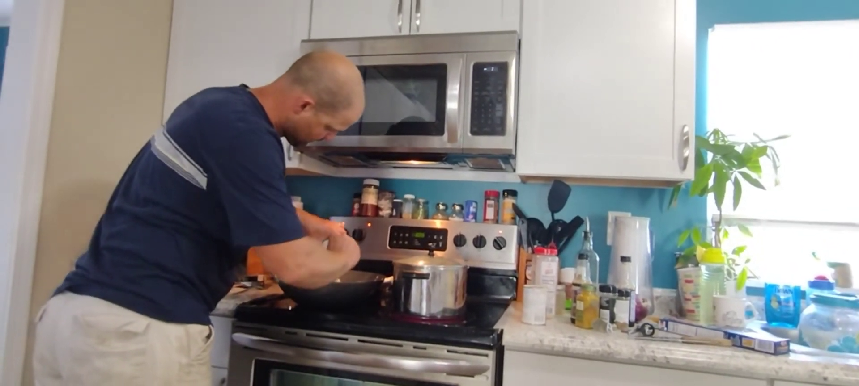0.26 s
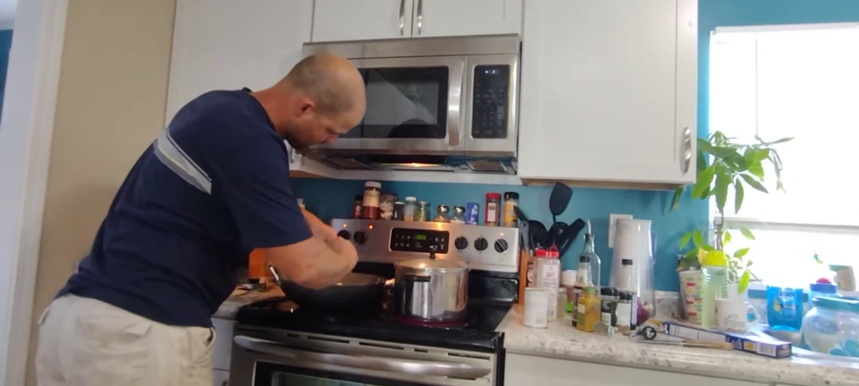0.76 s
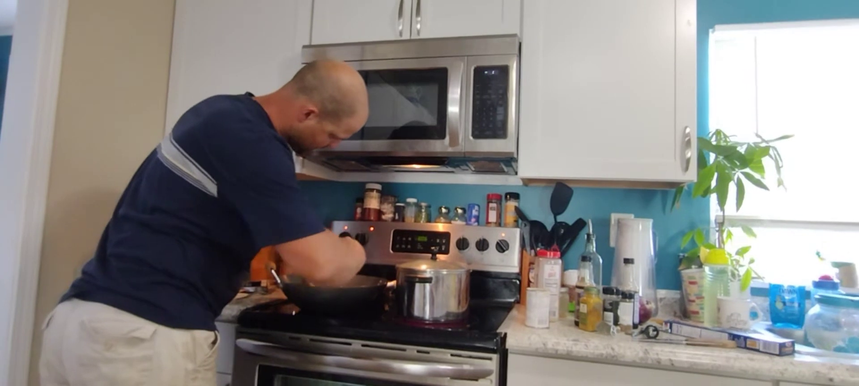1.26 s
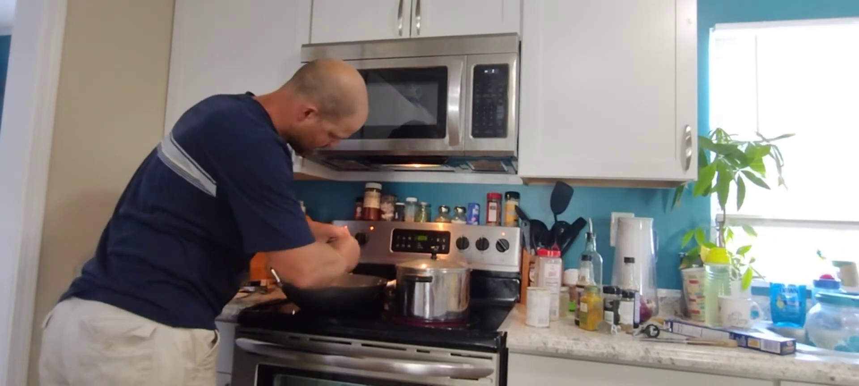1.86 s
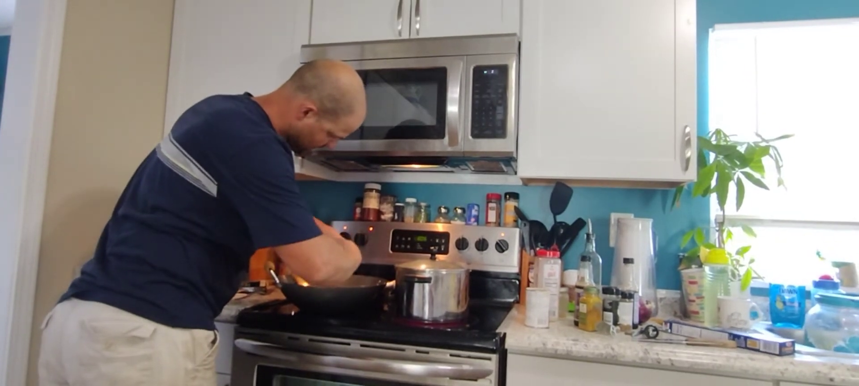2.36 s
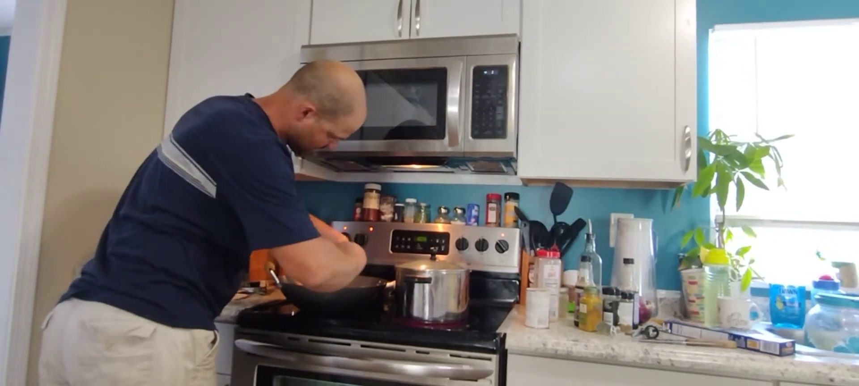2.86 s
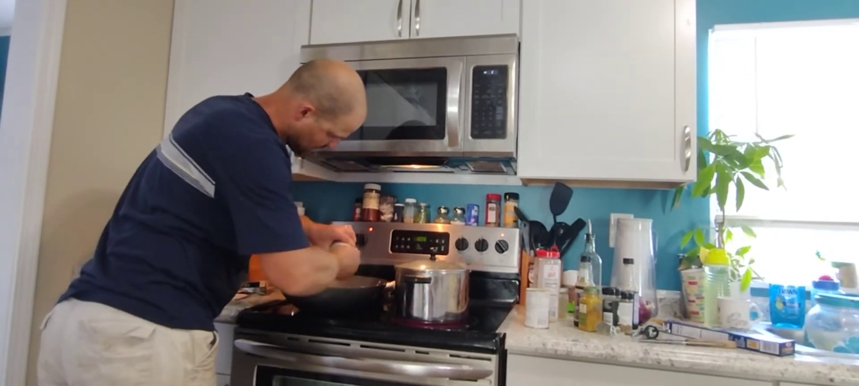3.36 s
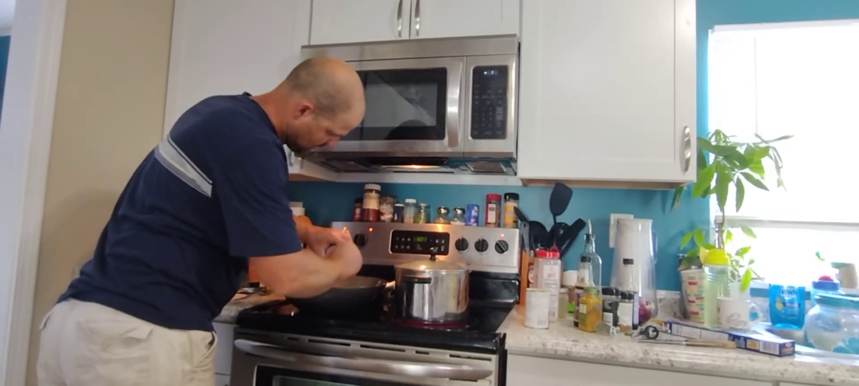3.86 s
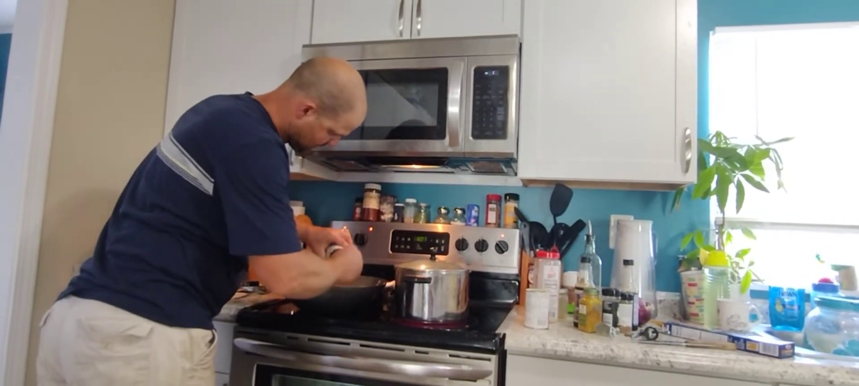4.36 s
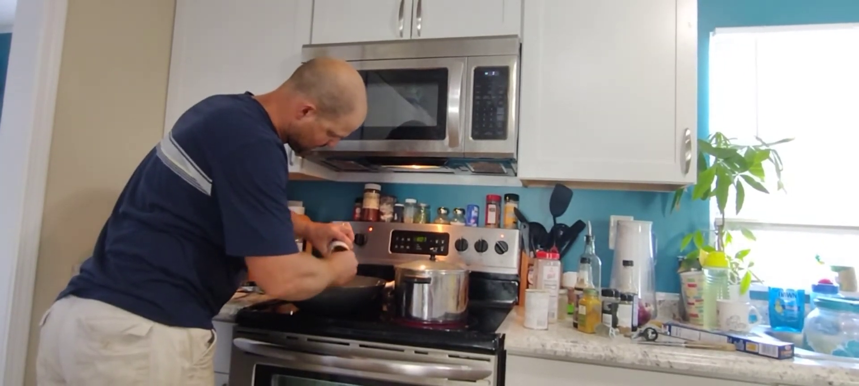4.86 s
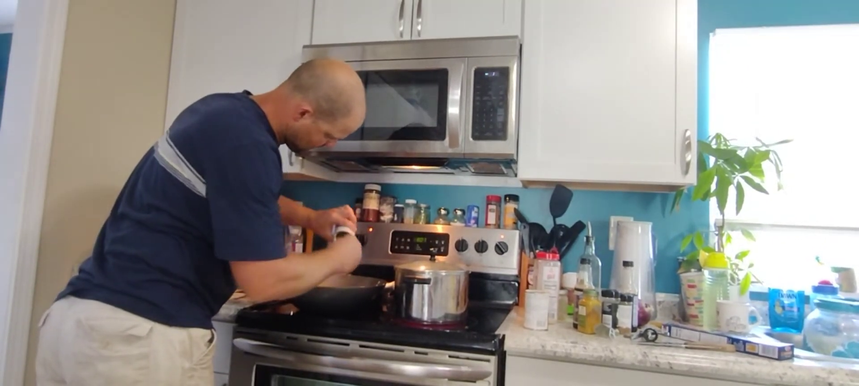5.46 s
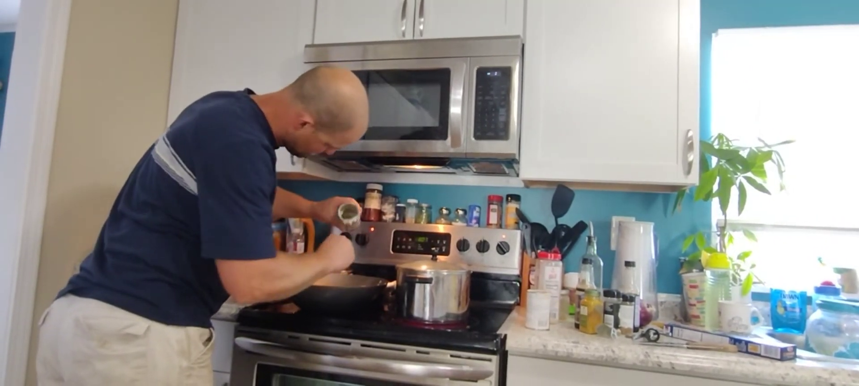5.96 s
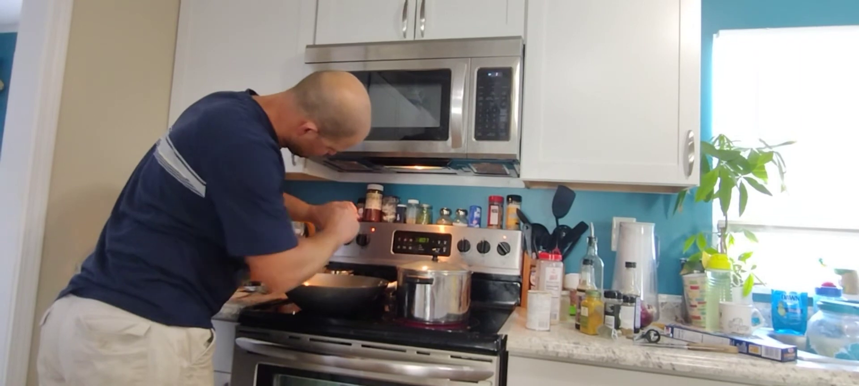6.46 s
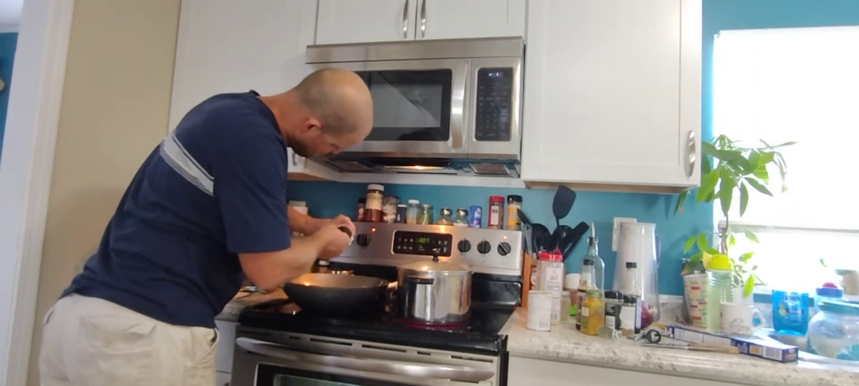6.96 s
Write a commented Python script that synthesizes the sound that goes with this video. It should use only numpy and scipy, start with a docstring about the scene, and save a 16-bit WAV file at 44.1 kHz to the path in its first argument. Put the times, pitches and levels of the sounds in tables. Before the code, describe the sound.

A steel can opener works around a tin in a small, hard-walled kitchen, heard in stereo from a few steps away. A hollow tonk opens at 0 s, with lighter clicks at 0.3-0.5 s and a strong, ringing clunk near 0.8 s. A gritty scrape at 1.0-1.3 s makes the can's air hum in fluttering bursts. Another hollow knock falls at 1.6 s, then a bright clank at 2.3 s with a thin squeak. Firm rasps swell around 2.5 and 2.9 s. Sharp clicks and hollow clanks cluster at 3.2-4.0 s, the brightest at 3.6 and 3.95 s. Smaller ticks and faint rubbing follow, with moderate knocks at 4.7 and 5.0 s and a light flurry until 5.3 s. After roughly a second of near-pause, a double clank at 6.5 s leads into a faint scrape and squeak. Low, wavering appliance drone runs throughout.

```python
"""In a kitchen, some steps from a stereo microphone, a steel tool works round the rim of a tin can.
It knocks (noise cracks and decaying modes), scrapes (swelling coloured noise) and squeaks (narrow noise).
The air in the can answers near 620 Hz, its wall rings briefly above; hard walls smear every contact.
Appliances drone low in the background: broad noise and wavering tones."""
import sys
import numpy as np
from scipy import signal
from scipy.fft import rfft, irfft, next_fast_len
from scipy.io import wavfile
from scipy.ndimage import uniform_filter1d, map_coordinates

SR = 44100
rng = np.random.default_rng(int(sys.argv[2]) if len(sys.argv) > 2 else 0)


def int16_out(signal):
    """Quantize to a 16-bit WAV file."""
    q = np.round(np.clip(np.atleast_2d(signal).T, -1, 1) * 32767)
    wavfile.write(sys.argv[1], SR, q.astype(np.int16))


N = 318402

# how alike cracks and scrapes reach the two microphones: f/Hz, left-right likeness (1 = same)
CAN_LIKENESS = [(300, 1), (640, 0.93), (1400, 0), (3100, 0), (6800, 0.064), (10000, 0.8), (15000, 0.7)]


def amp(db):
    """Amplitude factor of a level in dB."""
    return 10 ** (np.asarray(db) / 20)


def unit(x):
    """x scaled to an rms of 1."""
    return x / np.sqrt(np.mean(x ** 2) + 1e-20)


def along(points, hz):
    """Reads a curve of (f/Hz, value) points on a log frequency axis."""
    f, value = np.transpose(points)
    return np.interp(np.log(hz + 1), np.log(f + 1), value)


def filtered(x, response):
    """x shaped by a complex response of frequency."""
    m = next_fast_len(N + SR // 2)
    spectrum = rfft(x, m) * response(np.fft.rfftfreq(m, 1 / SR))
    return irfft(spectrum, m)[..., :N]


def resonances(peaks):
    """Response of parallel resonators (f/Hz, width/Hz, level/dB), alternating in polarity."""
    def response(f):
        total = 0
        for k, (centre, width, db) in enumerate(peaks):
            total = total + (-1) ** k * amp(db) * 1j * f * width / (centre ** 2 - f * f + 1j * f * width)
        return total
    return response


def wobble(rate):
    """A smooth random curve, rate knots a second."""
    knots = rng.standard_normal(int(N * rate / SR) + 4)
    return map_coordinates(knots, [np.arange(N) * rate / SR])


def pair(response, alike, patchy_db=0):
    """Stereo noise of rms 1 with a colour, a likeness of the channels and patches of random gain."""
    z = signal.stft(rng.standard_normal((2, N)), nperseg=256)[2]
    field = uniform_filter1d(rng.standard_normal(z.shape[1:]), size=3, axis=0)  # over frequency
    field = uniform_filter1d(field, size=12, axis=1)  # over time
    noise = signal.istft(z * amp(patchy_db * unit(field)), nperseg=256)[1][:, :N]

    def mid_side(hz):
        turn = np.arccos(np.clip(along(alike, hz), -1, 1)) / 2
        return response(hz) * np.array([np.cos(turn), np.sin(turn)])
    mid, side = filtered(noise, mid_side)
    return unit(np.array([mid + side, mid - side]))


def add(track, s, sound):
    """Lays a sound into a track at s seconds."""
    k = round(s * SR)
    track[..., k:k + sound.shape[-1]] += sound


def pressure():
    """Gains of rasp, hollow, grind and edge: strokes swell to their firmest moment over light rubbing."""
    # strokes along the rim: start t/s, firmest t/s, end t/s, rasp level/dB, hollow level/dB
    strokes = [(0.0, 0.006, 0.11, -52.5, -38), (0.467, 0.533, 0.65, -55.5, -52),
               (0.79, 0.829, 0.95, -61, -39), (1.017, 1.119, 1.275, -45, -34.5),
               (1.757, 1.94, 2.03, -74.5, -59), (2.316, 2.347, 2.4, -70, -43),
               (2.417, 2.526, 2.632, -48, -38.5), (2.829, 2.915, 3.028, -45, -36),
               (3.206, 3.277, 3.44, -63.5, -64.5), (3.615, 3.706, 3.874, -56, -50.5),
               (3.97, 4.002, 4.16, -74, -42.5), (4.692, 4.757, 5, -69, -85),
               (5.28, 5.36, 5.48, -75.5, -66.5), (6.604, 6.724, 6.96, -80, -62.5)]
    # light rubbing between and under the strokes: t/s, rasp level/dB
    rubbing = [(0.0, -63), (0.34, -77), (0.42, -73), (1.12, -70), (2.21, -73), (2.45, -69), (2.59, -68),
               (3.24, -72.5), (3.66, -69.5), (4.22, -68), (5.19, -70.5), (5.45, -73), (5.95, -82),
               (6.43, -86.5), (6.6, -74), (7.22, -77)]
    # how pointed the swell is: exponents of rasp, hollow, grind, edge
    pointedness = [2.2, 1.8, 3, 2.4]
    rubbing_hollow_db = 2.5  # over the rasp
    full_stroke_db = -45
    grind_db, grind_grows = -0.8, 1.06  # over the rasp of a full stroke; dB per dB of rasp
    edge_db, edge_grows = 4, 1.2  # treble of the rasp, by the same law

    def four_gains(rasp_db, hollow_db):
        below_full = rasp_db - full_stroke_db
        grind = full_stroke_db + grind_db + grind_grows * below_full
        edge = full_stroke_db + edge_db + edge_grows * below_full
        return amp([rasp_db, hollow_db, grind, edge])

    t = np.arange(N) / SR
    light_db = np.interp(t, *np.transpose(rubbing))
    total = four_gains(light_db, light_db + rubbing_hollow_db)
    for start, firmest, end, rasp_db, hollow_db in strokes:
        push = np.sin(np.pi / 2 * np.interp(t, [start, firmest, end], [0, 1, 0]))
        swell = push ** np.array(pointedness)[:, None]
        total = total + four_gains(rasp_db, hollow_db)[:, None] * swell
    return total


def drag():
    """Rubbing grains hiss, colour in the tin and keep the air column humming unevenly."""
    # colour of the rubbing hiss: f/Hz, level/dB per Hz (relative)
    rasp_colour = [(530, -62), (900, -15), (1420, 2.5), (1700, -9.5), (1880, -24), (2570, -8), (4310, -6.5),
                   (4800, -2), (15100, -11), (16000, -39)]
    # resonances of the rasped tin: f/Hz, width/Hz, level/dB (doubled in amplitude below)
    rim = [(1215, 60, -3), (1510, 270, -26), (1863, 81, 19), (2150, 182, 16), (3300, 280, 2), (4076, 43, 9),
           (5600, 120, -9)]
    # resonances of the ground wall: f/Hz, width/Hz, level/dB (relative)
    grind_modes = [(1300, 300, -3), (1458, 160, 3), (1890, 170, 1), (2240, 118, 4.5), (2460, 320, -12),
                   (3454, 120, -0.5)]
    # resonances of the rasped air: f/Hz, width/Hz, level/dB (relative, ahead of the low cut)
    air_modes = [(550, 61.4, -8.5), (607.3, 17.4, 3.5), (612, 23.7, 7), (642.4, 61.3, -4.5),
                 (753, 7, -11.5)]
    rasp_gain, hollow_gain, grind_gain, edge_gain = pressure()
    tin = resonances(rim)
    rasp = pair(lambda f: amp(along(rasp_colour, f)) * (1 + 2 * np.abs(tin(f))), CAN_LIKENESS, patchy_db=2.0)
    grain = amp(2.2 * wobble(45) + 2.2 * wobble(500))  # slow and fast roughness
    grind = grind_gain * pair(resonances(grind_modes), CAN_LIKENESS, patchy_db=4)
    edge = filtered(rasp, lambda f: 1 / (1 + (8000 / (f + 1)) ** 6))  # the treble alone
    low_cut = lambda f: f ** 4 / (f ** 4 + 520 ** 4)
    air = pair(lambda f: resonances(air_modes)(f) * low_cut(f), [(600, .9)])
    air = filtered(air, lambda f: np.exp([[.25j], [-.25j]]))  # the left microphone leads by 0.5 rad
    scrape = rasp_gain * (rasp - edge) + edge_gain * edge + grind
    return grain * scrape + hollow_gain * air


def drone():
    """Broad appliance noise with low tones that swell and waver slowly."""
    # colour of the noise: f/Hz, level/dB per Hz (relative)
    colour = [(18, -46), (30, -11.5), (189, 3.5), (280, -6), (473, -5), (569, -13), (801, -9.5),
              (1070, -13.5), (1460, -14), (6720, -32), (14800, -39.5), (16000, -61)]
    # left-right likeness of the noise: f/Hz, likeness (negative = opposed)
    likeness = [(60, 0.82), (180, 0.87), (550, 0.47), (1650, -0.46), (4970, 0.096), (15000, 0.34)]
    # appliance tones: f/Hz, middle level/dB
    hum = [(25, -92), (58, -78), (82, -69.5), (118, -71.5), (167, -68), (195, -71.5), (242, -77),
           (690, -78), (802, -77)]
    noise_db = -63
    t = np.arange(N) / SR
    tones = 0
    for hz, db in hum:
        gain = amp(db + 1.79 * wobble(5.1))
        tones = tones + gain * np.sin(2 * np.pi * hz * t + 1.5 * wobble(4.4))
    return amp(noise_db) * pair(lambda f: amp(along(colour, f)), likeness) + tones


def toot(t, hz, t60, rise, beat_db):
    """The air column swells, rings and beats against a neighbouring mode 4.5 % above or below."""
    lead = np.array([[.25], [-.25]])  # rad; the left microphone hears it a little early
    near_hz = hz * rng.choice([.955, 1.045])
    near = amp(beat_db) * np.sin(2 * np.pi * (near_hz * t + rng.random()) + lead)
    envelope = amp(-60 * t / t60) * (1 - np.exp(-t / rise))
    return (np.sin(2 * np.pi * hz * t + lead) + near) * envelope


def clang(t, hz, db, t60, rough):
    """Fading wall modes stray in phase, since hand and tool keep touching the tin; high ones die first."""
    steps = rng.standard_normal((2, len(hz), len(t) // 64 + 1))  # per microphone and mode
    stray = np.cumsum(steps, -1).repeat(64, -1)[..., :len(t)]
    phase = 2 * np.pi * (hz * t + rng.random((2, len(hz), 1)))
    phase = phase + rough * (hz / 2000) ** 0.38 * uniform_filter1d(stray, 128)
    fade = amp(db - 60 * t / t60 * (hz / 2000) ** 0.29)  # t60 holds at 2 kHz
    return (fade * np.sin(phase)).sum(1) * (1 - np.exp(-t / 0.0011))


def knocks():
    """Each contact: a noisy crack, the hollow note, a thud, free modes and the wall's modes at new strengths."""
    # steel on the rim: t/s, crack level/dB, crack treble level/dB, fade t60/s, hollow level/dB, hollow f/Hz,
    # time until the hand mutes the hollow/s, base thud level/dB, level/dB and f/Hz of the mode the grip
    # leaves free, wall level/dB in each of the three zones; hard clanks add level/dB, f/Hz of free modes
    contacts = [(0.0112, -44, -53, 0.13, -15.5, 630, 0.022, -54, -52, 2410, -64, -49.5, -76),
                (0.2982, -43, -62, 0.17, -29, 624, 0.025, -59, -53, 2163, -59, -76, -67),
                (0.385, -48, -69, 0.33, -58, 645, 0.07, -68, -56, 2129, -62, -68, -63),
                (0.4934, -57, -80, 0.1, -64, 606, -5, -48, -45, 1322, -62, -53.5, -62),
                (0.7726, -30.5, -52, 0.2659, -14, 618, 0.5, -62, -35, 2502, -44, -54, -44.5, -44.5, 2234, -42.5, 3957),
                (1.3209, -53.5, -62, 0.24, -35, 615, 0.025, -70, -58, 5128, -70, -80, -69),
                (1.4501, -55.5, -65, 0.21, -79, 638, 3, -71, -65, 4680, -80, -80, -74),
                (1.5763, -36, -54, 0.37, -22.5, 607.3, 0.086, -64, -37, 2618.5, -50, -51, -56, -51, 3958),
                (2.1316, -54, -72, 0.1, -75, 606, 3, -63, -62, 2208, -72, -71, -56.5),
                (2.2638, -46.5, -64, 0.16, -54, 631, -3, -58, -56, 2220, -65, -62, -59),
                (2.2995, -32, -52, 0.26, -19, 615.5, 0.022, -40, -34, 1425, -43, -50, -43.5, -29, 2157, -34, 1575, -38.5, 3233),
                (2.7686, -44, -69, 0.14, -44.5, 617, 0.03, -70, -55, 1425, -55, -77, -61),
                (3.1971, -42, -56, 0.25, -48, 615, 0.062, -48, -56, 1450, -64, -61, -69),
                (3.4575, -39, -42, 0.19, -73, 597, 0.07, -47, -40, 2262, -77, -41, -50, -42, 3193, -47, 5850),
                (3.5638, -47, -57, 0.28, -49, 636, 0.07, -69, -50, 5465, -78, -70, -74),
                (3.6007, -39, -55, 0.38, -18.5, 625, 0.049, -39, -39, 2159, -46, -52, -57, -43, 1368, -41, 1668, -39, 2639, -43, 3731, -47, 5315),
                (3.8836, -39.5, -51.5, 0.22, -39, 625.5, -8, -38, -49, 1980, -58.5, -70, -63),
                (3.9524, -38, -65, 0.28, -19, 583.5, 0.014, -36, -34.5, 1530, -48, -43.5, -47, -33.5, 2440.5, -39, 2790, -38, 3836, -48, 5832),
                (4.2124, -51.5, -88, 0.5, -43.5, 597.5, 8, -75, -62, 2170, -71, -76, -64),
                (4.4184, -59, -75, 0.7, -50, 588.5, 0.065, -65, -71, 1481, -81, -81, -79),
                (4.4694, -60, -67, 0.5, -48, 621, 1.5, -81, -62, 5227, -82, -83, -76),
                (4.6733, -39.5, -55, 0.21, -40, 618.5, 0.062, -51, -46, 3330, -73, -60, -54),
                (4.9591, -40, -48.5, 0.2, -41, 630, 0.04, -74, -60, 3600, -74, -74, -59),
                (5.0444, -54, -61, 0.7, -44.5, 626, -3, -66, -57.5, 6045, -86, -80, -63),
                (5.1766, -52, -54, 0.04, -68, 588, 0.07, -48, -48.5, 2687, -77, -54, -55),
                (5.242, -58, -63, 0.43, -36, 619.5, 0.022, -60, -67, 3548, -76, -77, -74),
                (5.2649, -50, -69, 0.29, -41.5, 598.4, -0.2, -46, -59.5, 2170, -66, -74, -64),
                (5.3244, -54, -71, 0.27, -43, 635, 0.04, -70, -58, 3457, -80, -75, -66),
                (6.4557, -47, -67, 0.36, -49.5, 630, 0.07, -54, -55, 2550, -67, -68, -66),
                (6.5216, -42, -58, 0.24, -26.5, 637, 0.1, -47, -34, 1575, -55, -60, -59, -43.5, 2675, -41.5, 4071, -43.5, 5830)]
    # brief swells of the hollow note, mostly during scrapes: t/s, level/dB, f/Hz
    hollow_swells = [(0.049, -23, 593), (0.814, -24, 602), (1.054, -22.5, 621), (1.084, -16.5, 617),
                     (1.103, -12, 600), (1.134, -13, 605), (1.17, -17, 628.8), (1.625, -20.5, 610),
                     (1.698, -34.5, 621), (1.835, -41.5, 582), (1.922, -51, 632), (2.024, -41.5, 598),
                     (2.487, -21.5, 597), (2.544, -22.5, 610), (2.868, -28, 567), (2.889, -23, 605),
                     (2.921, -17, 625), (2.957, -27, 602.5), (3.679, -23.5, 618), (3.717, -32.5, 623)]
    # modes of the wall: f/Hz, level/dB over the zone's, longest t60/s (scaled with f in clang)
    wall_modes = [(1437, 4.5, 0.19), (1493, 0, 0.5), (1603, 1.5, 0.41), (2070, -3, 0.22), (2236, 4, 0.13),
                  (2400, -5.5, 0.17), (2560, 4, 0.36), (2715, -5, 0.3), (2860, -20, 5.0), (3140, -43, 0.27),
                  (3560, 1.5, 0.17), (3785, -1.5, 0.39), (3850, -9, 0.45), (3787, 1.5, 0.041),
                  (4818, -11, 0.1), (5330, -12, 0.27), (5740, -27, 0.29), (6350, -19, 0.24)]
    # where the wall levels of a contact apply: f/Hz
    zones_hz = [1500, 2400, 3700]
    # colour of the crack: f/Hz, level/dB per Hz (relative)
    crack_colour = [(150, -83), (250, -20), (407, -15.5), (629, 0.5), (1120, -14.5), (1910, -11.5),
                    (2240, -8), (4190, -16.5), (5830, -14.5), (6360, -16.5), (16000, -16.5)]
    base_hz, hollow_t60_s = 769, 0.24
    out, fade = np.zeros((2, N + SR)), np.zeros((2, N + SR))
    t = np.arange(SR // 3) / SR
    hz, level, t60 = np.transpose(wall_modes)[:, :, None]
    for s, crack_db, top_db, decay, hollow_db, pitch, mute, base_db, *wall in contacts:
        burst = amp(-60 * t / decay) + .5 * amp(-60 * t / 0.0017)
        burst = burst * (1 - np.exp(-t / 0.0014))
        add(fade, s, amp([[crack_db], [top_db]]) * burst)
        # the muting hand leaves 18 % of the hollow; a negative time means muted from the start
        grip = .18 + .82 / (1 + np.exp(np.minimum((t - mute) / .004, 50)))
        add(out, s, amp(hollow_db) * grip * toot(t, pitch, hollow_t60_s, rise=.005, beat_db=-15))
        add(out, s, amp(base_db) * toot(t, base_hz, 0.68 * decay, rise=0.0012, beat_db=-2))
        zones_db = wall[2:5]
        free_db, free_hz = np.reshape(wall[:2] + wall[5:], (-1, 2, 1)).transpose(1, 0, 2)
        for detune, offset_db in (1, 1), (1.04, -9.5):  # a dented wall splits each mode in two
            add(out, s, clang(t, detune * free_hz, free_db + offset_db, 0.75 * decay, rough=0.31))
        wall_db = along(list(zip(zones_hz, zones_db)), hz) + level
        wall_db = wall_db + 4 * rng.standard_normal(hz.shape)
        add(out, s, clang(t, hz, wall_db, np.minimum(t60, decay), rough=0.4))
    for s, db, pitch in hollow_swells:
        add(out, s, amp(db) * toot(t, pitch, .1, rise=.008, beat_db=-9))
    crack = pair(lambda f: amp(along(crack_colour, f)), CAN_LIKENESS, patchy_db=4.5)
    top = filtered(crack, lambda f: 1 / (1 + (9000 / (f + 1)) ** 6))
    return out[:, :N] + fade[0, :N] * (crack - top) + fade[1, :N] * unit(top)


def kitchen(x):
    """The hard walls answer 300 samples (7 ms) late; each frequency dies at its own speed."""
    # decay of the room: f/Hz, t60/s
    room_t60 = [(300, 0.15), (2000, 0.3), (8000, 0.15), (15000, 0.067)]
    hz, t, z = signal.stft(rng.standard_normal((2, SR // 2)), SR, nperseg=256)
    decay = amp(-60 * t / along(room_t60, hz)[:, None])
    tail = signal.istft(z * decay, SR, nperseg=256)[1]
    late = np.pad(x, ((0, 0), (300, 0)))
    return signal.fftconvolve(late, tail / np.linalg.norm(tail[0]), axes=1)[:, :N]


def squeaks():
    """Narrow, broken whistles of light rubbing that set in quickly and fade."""
    # start t/s, end t/s, f/Hz, resonator width/Hz (applied twice), level/dB ahead of swell and flicker
    whistles = [(0.912, 1.062, 2900, 60, -69), (0.927, 1.035, 2270, 40, -66), (1.18, 1.404, 5240, 180, -76),
                (1.185, 1.274, 9430, 100, -65), (1.828, 2, 3200, 121, -79), (2.327, 2.554, 3245, 140, -59),
                (3.195, 3.393, 2150, 60, -69), (5.28, 5.806, 3100, 330, -77), (6.704, 6.882, 1586, 60, -71)]
    t, out = np.arange(N) / SR, 0
    hiss = pair(np.ones_like, [(3000, .3)])
    for start, end, hz, width, db in whistles:
        progress = np.clip((t - start) / (end - start), 0, 1)
        swell = np.sin(np.pi * progress ** 0.42) ** .5
        flicker = amp(2.2 * wobble(40))
        whistle = unit(filtered(hiss, lambda f: resonances([(hz, width, 0)])(f) ** 2))
        out = out + amp(db) * flicker * swell * whistle
    return out


def scene():
    """The can, leaning left or right by frequency, its smear off the kitchen walls, and the drone."""
    # balance of the can: f/Hz, left minus right level/dB
    lean = [(300, 2.5), (620, -1.5), (1500, -2.5), (4000, 1), (9000, 1), (15000, 1)]
    can = knocks() + drag() + squeaks()
    can = filtered(can, lambda f: amp(along(lean, f) * [[.5], [-.5]]))
    return can + amp(-9) * kitchen(can) + drone()


def record(dry):
    """The microphones dip near 11 kHz, lift the top and keep nothing above their band limit."""
    # response of the microphones: f/Hz, level/dB
    microphone = [(8000, -1.5), (11000, -2.5), (13500, 1.5), (15800, 7.5)]
    top_hz = 15850
    return filtered(dry, lambda hz: amp(along(microphone, hz)) * (hz < top_hz))


dry = scene()
out = record(dry)
int16_out(out)
```